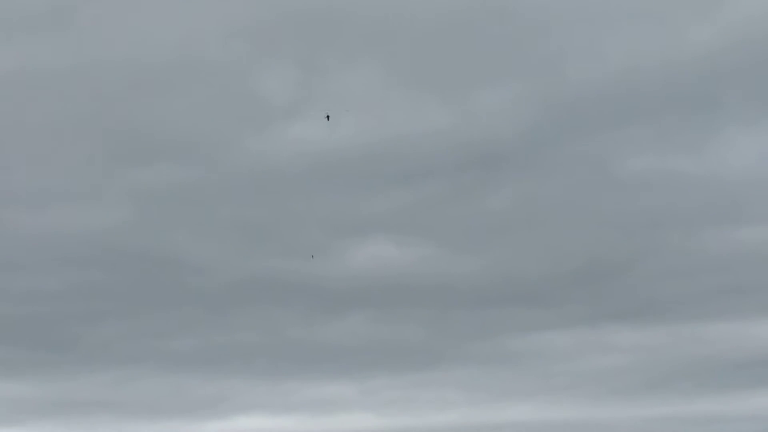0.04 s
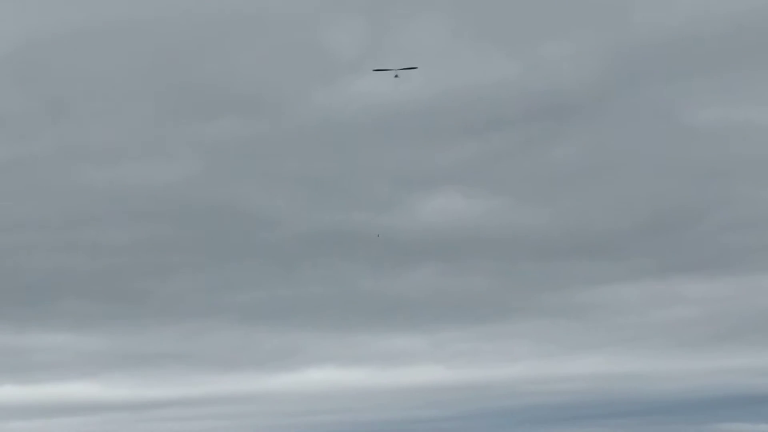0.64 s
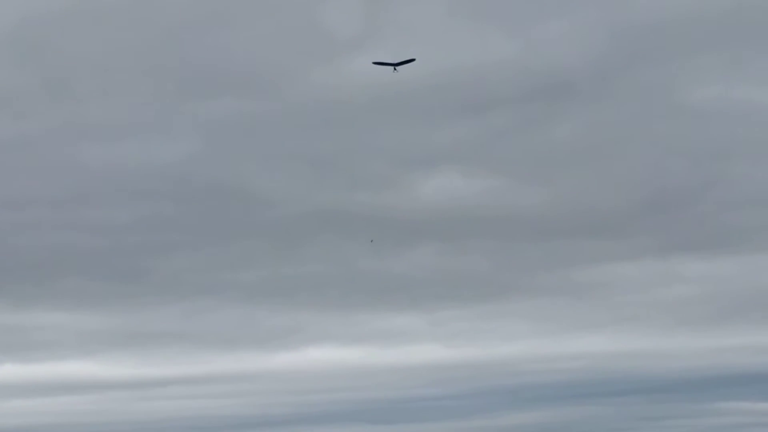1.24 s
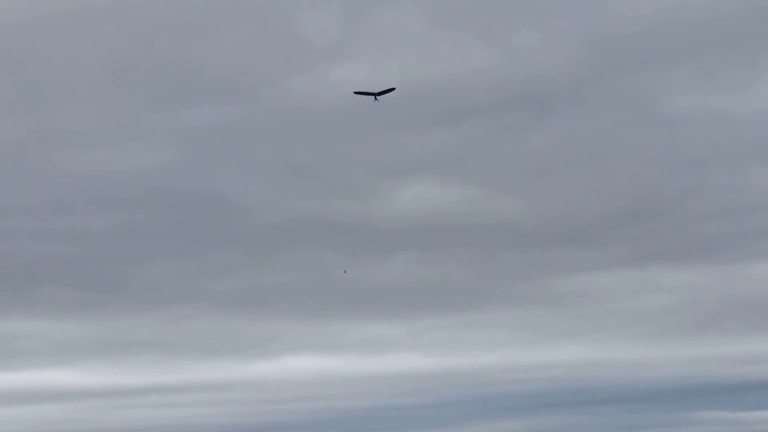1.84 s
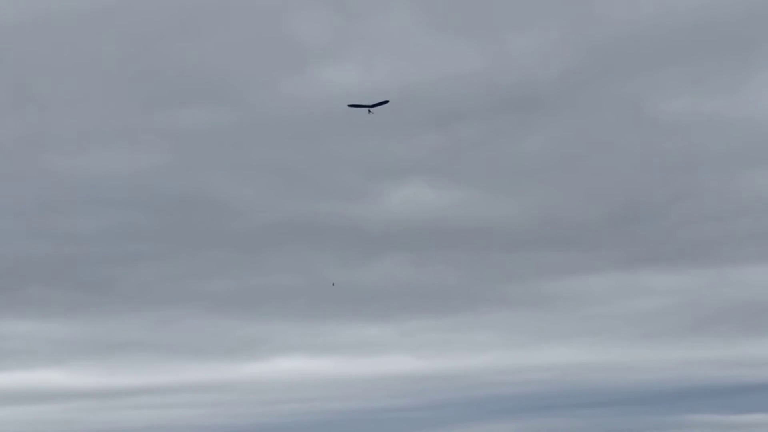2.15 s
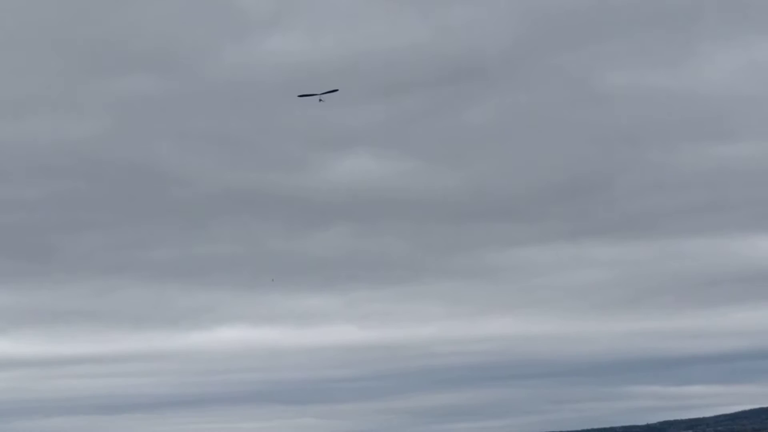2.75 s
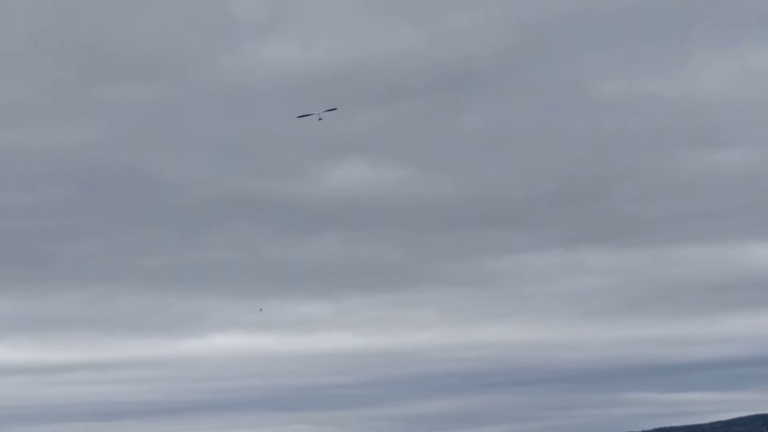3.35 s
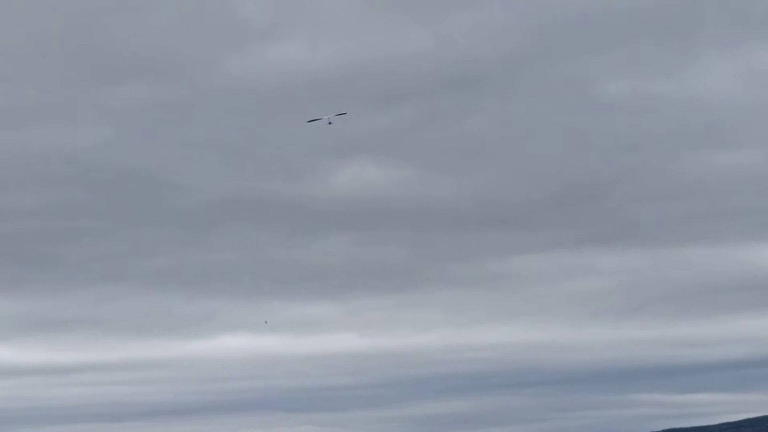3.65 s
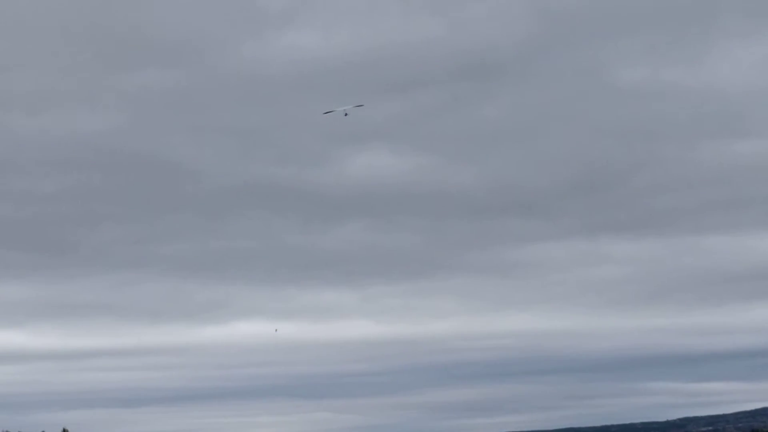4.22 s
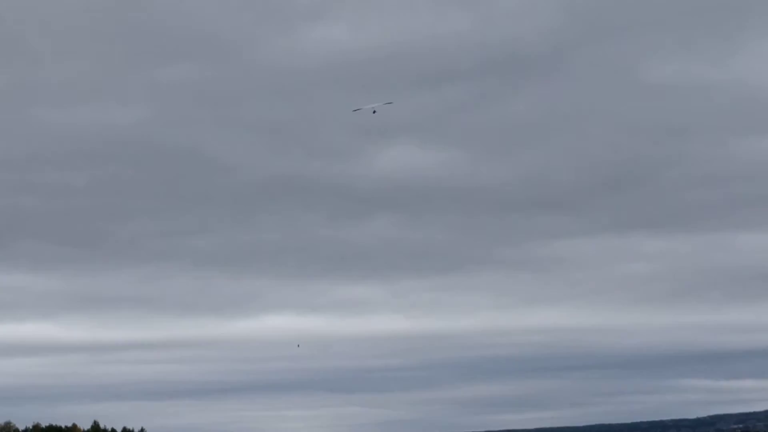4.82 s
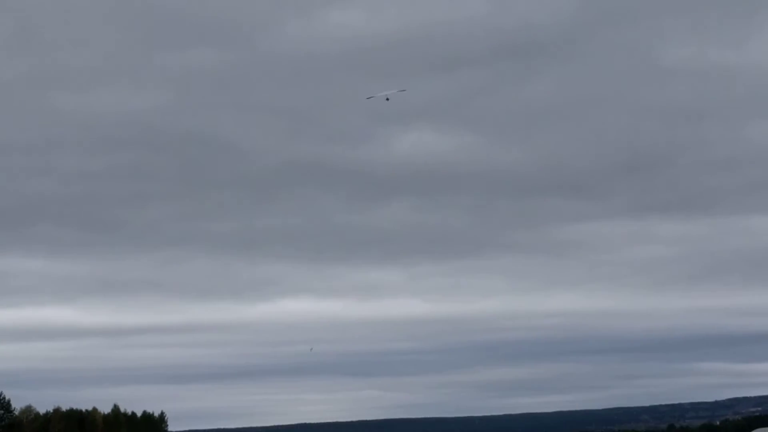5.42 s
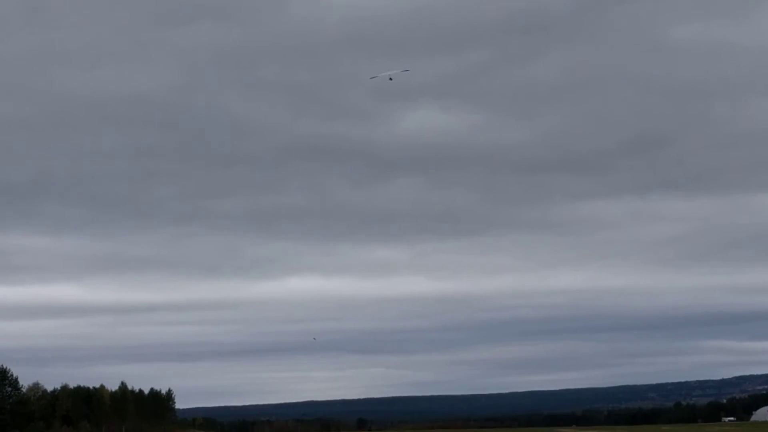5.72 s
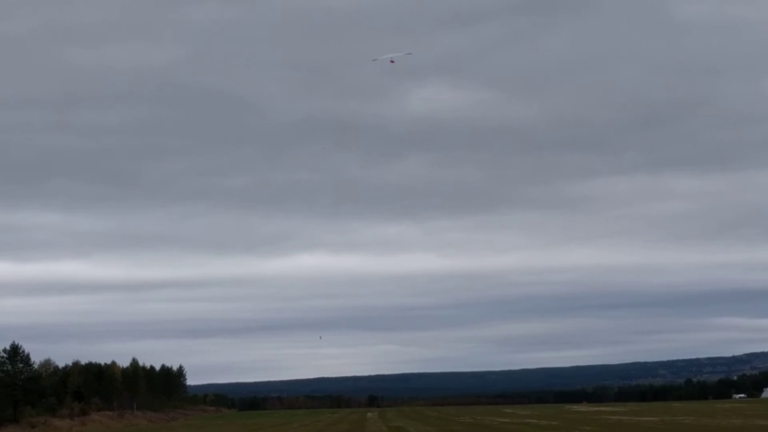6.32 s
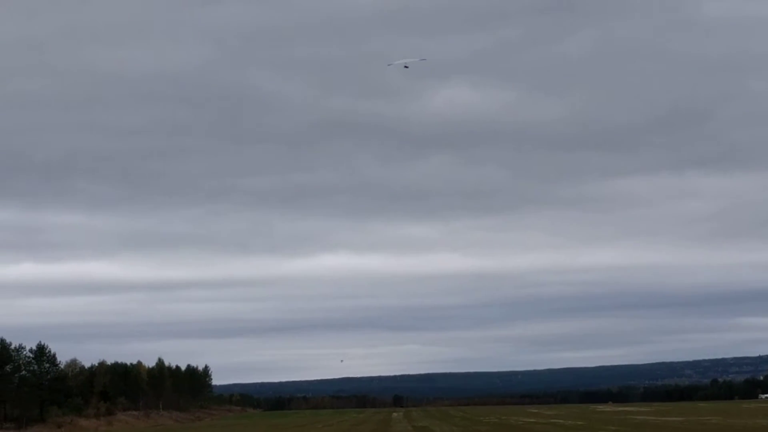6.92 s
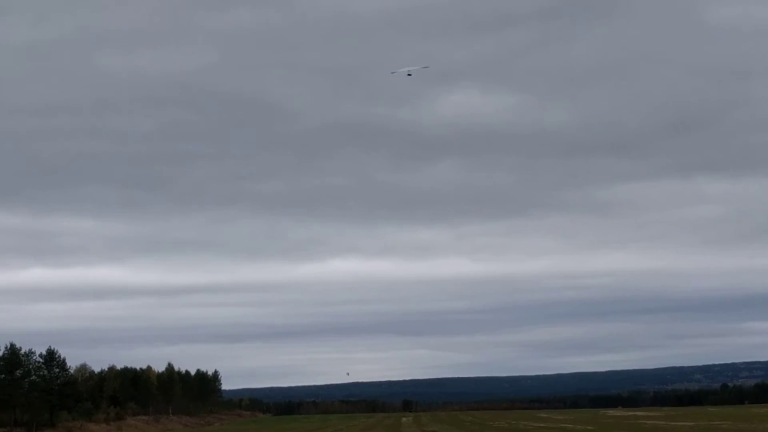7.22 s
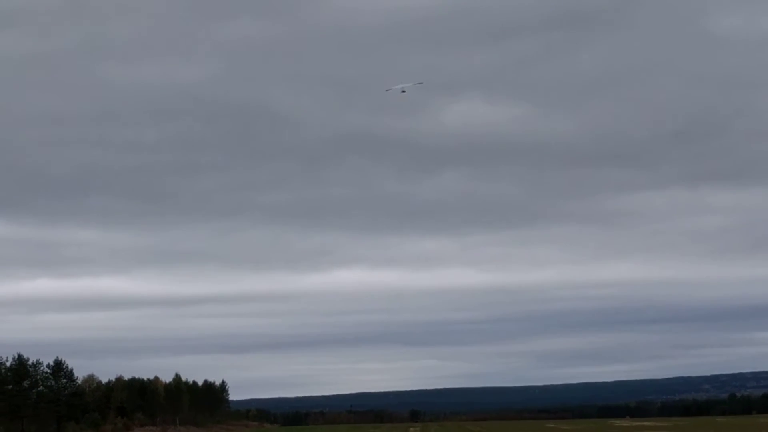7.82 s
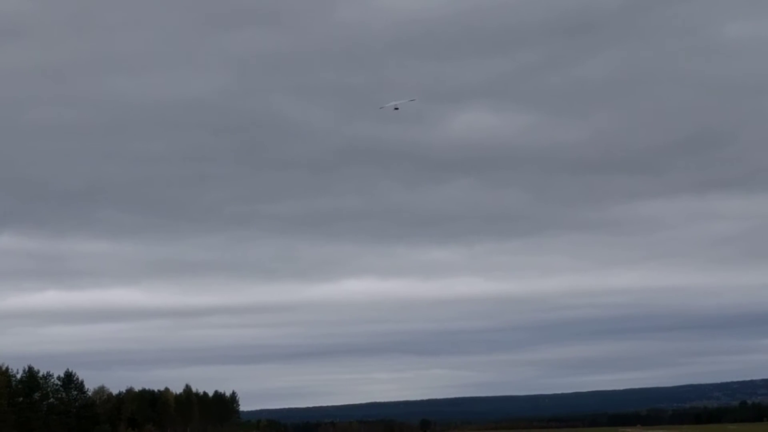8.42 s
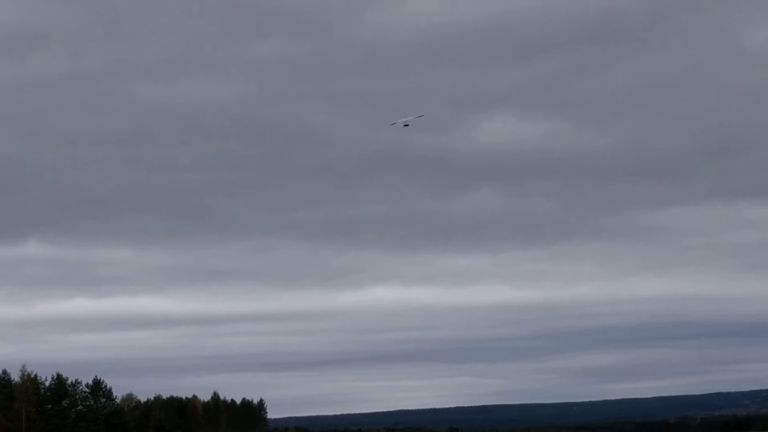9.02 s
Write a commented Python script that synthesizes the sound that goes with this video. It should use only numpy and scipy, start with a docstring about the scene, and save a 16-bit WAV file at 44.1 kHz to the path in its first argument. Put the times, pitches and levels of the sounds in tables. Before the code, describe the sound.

A tow line hisses loudly off a reel and dies away, leaving faint ticks, one metallic scrape and low wind rumble.

```python
"""Tow line reel on an airfield.

A line rushes off a reel, hissing and whistling in its guide, and dies down within two seconds.
It slaps the guide as it slackens. The reel idles on with a faint tick-tock, rattles and one squeak;
the line scrapes once over ringing metal, and a catch snaps shut near the end.
Gusts rumble on the microphone over murmuring trees and rustling grass."""
import sys
import numpy as np
from scipy import signal
from scipy.fft import rfft, irfft
from scipy.io import wavfile
from scipy.ndimage import uniform_filter1d

SR = 44100
rng = np.random.default_rng(int(sys.argv[2]) if len(sys.argv) > 2 else 0)


def to_wav(s):
    """Save 16-bit WAV."""
    ch = np.atleast_2d(s).T  # columns
    pcm = np.round(np.clip(ch, -1, 1) * 32767)  # PCM
    wavfile.write(sys.argv[1], SR, pcm.astype(np.int16))


N = 399546
TIME_S = np.arange(N) / SR

# running line (time [s], level [dB], relative body [dB], relative top [dB])
RUSH_CURVE = [(0.0, -21.5, -17, -10), (0.014, -23.5, -16, -10.5), (0.342, -26.5, -13.5, -13.5),
              (1.01, -40, -3, -17.5), (1.264, -48.5, 2.5, -13), (1.34, -48, 0, -18)]
# line friction (frequency [Hz], level [dB])
RUSH_SPECTRUM = [(60, -17), (280, -7), (600, -11.5), (1400, -10.5), (1900, -10), (2300, -11.5),
                 (3300, -6.5), (4500, -4.5), (5600, -18), (7000, -14), (8900, -8.5), (10300, -20),
                 (12500, -37), (15500, -51)]
# line whistling in the guide (time [s], pitch [Hz], relative level [dB])
WHISTLE_CURVE = [(0, 4650, 1), (.18, 4600, 3), (.3, 4390, -1), (.5, 4215, -13), (.75, 4160, -19),
                 (1.4, 4420, -9)]
# two flicks per turn (turns left at the last flick, level [dB], pitch [Hz])
TURN_FLICKS = [(2, -39, 4340), (1.35, -48.5, 5700)]
# line hitting the guide (time [s], level [dB], relative body [dB], t60 [s])
SLAP_HITS = [(0.092, -16, -16, .045), (0.1598, -15, -21, .04), (0.23, -17.5, -16, 0.021),
             (0.2845, -12.5, -18, 0.023), (0.3708, -12.5, -24, .046), (0.4583, -14.5, -18.5, 0.061),
             (0.941, -20, -32, .08), (1.3789, -21.5, -14.5, 0.055), (1.5401, -11.5, -20, 0.062),
             (1.5641, -24, -11, 0.15), (2.0127, -24, -10, .072), (2.5974, -33, -14.5, 0.086),
             (2.656, -29, -16, 0.083), (2.811, -38.5, -20, 0.13), (3.6635, -38, -22, 0.046)]
# line strokes over metal (time [s], level [dB], t60 [s])
SCRAPE_STROKES = [(4.224, -30.5, 0.23), (4.268, -27.5, 0.21), (4.316, -31, 0.082), (4.34, -36.5, 1.26),
                  (4.470, -29.5, 0.5), (4.598, -36.5, 0.7), (4.69, -46, 0.28)]
# one tick per idle turn (time [s])
TICK_TIMES_S = [3.6226, 3.801, 3.9959, 4.904, 5.1213, 5.36, 5.6216, 5.842, 6.0561, 6.3177, 6.552, 6.765,
                6.983, 7.2384, 7.444, 7.641, 7.8476, 8.0621, 8.309, 8.487, 8.692, 8.967]
# axle squeak (time [s], pitch [Hz], level [dB])
SQUEAK_CURVE = [(3.198, 1910, -90), (3.203, 1950, -46), (3.211, 2130, -44), (3.218, 2410, -46),
                (3.228, 2820, -58), (3.24, 3000, -100)]
# its partials (harmonic number, level [dB])
SQUEAK_HARMONICS = [(1, -17), (2, -0.5), (3, -9), (4, -13)]
# wind on the microphone (time [s], level [dB])
GUST_CURVE = [(0, -49), (0.2, -47), (0.95, -41.5), (1.1, -49.5), (1.52, -49.5), (1.68, -40.5), (2.0, -45),
              (2.62, -46), (2.9, -55), (3.1, -38), (3.65, -42.5), (4.0, -50), (5.2, -39.0), (5.65, -41),
              (5.85, -55.0), (6.55, -48.5), (7.0, -49.5), (7.58, -49.0), (7.72, -44.0), (8.45, -40),
              (8.65, -44), (8.85, -37.5), (9.06, -42)]
# breeze (time [s], trees [dB], grass [dB])
BREEZE_CURVE = [(2.1, -64.5, -69), (2.72, -63, -62), (2.82, -63.5, -65.5), (4.15, -61, -63),
                (4.95, -59.5, -61), (5.22, -59.5, -65.5), (5.51, -59, -61), (6.04, -64.5, -70),
                (6.83, -61, -66.5), (7.14, -65, -67), (8.75, -63, -68.5)]

# contacts (time [s], level [dB])
METAL_KNOCKS = [(4.2695, -6.5)]
CATCH_CLICKS = [(8.811, -37), (8.8125, -8.5), (8.821, -23.5)]
LOUD_RATTLES = [(1.8941, -51.5), (2.2124, -54.5), (2.386, -55), (3.0724, -52.5), (3.246, -53.5),
                (3.442, -55.5), (4.0267, -52.5), (5.695, -55.5), (5.968, -58.5), (6.2447, -58),
                (6.9112, -58.5), (7.0319, -58.5), (8.36, -54), (8.5265, -58.5), (8.881, -48.5)]
THUMP_HITS = [(2.015, -44), (2.656, -45.5), (3.662, -41.5), (4.274, -46.5), (4.408, -39.5), (6.547, -48),
              (7.677, -47.5), (7.725, -42.5), (8.445, -47.5), (8.759, -48)]

# resonances (frequency [Hz], width [Hz], gain [dB])
GUIDE_MODES = [(1850, 82, -5.5), (2640, 90, 4), (5020, 880, 0)]
FRAME_MODES = [(1000, 91, 0)]
SNAG_RING = [(1150, 310, -7.5), (2750, 350, -1.5), (3900, 500, -0.5), (4850, 560, 0), (8500, 1800, -11),
             (12400, 250, -13)]
HOUSING_MODES = [(312, 34, -3), (697, 26, 7.5), (915, 145, 4.5), (1240, 340, -0.5), (1870, 120, 6),
                 (2670, 290, 6.5), (3300, 230, 3), (3620, 130, -0.5), (4200, 150, -7)]
METAL_MODES = [(1467, 8.6, -11.5), (1640, 6.5, -3), (1803, 13, -7), (1900, 21, -5.5), (2135, 31, -5),
               (2317, 29, -3.5), (2550, 22, -12), (2720, 22, -2.5), (2930, 11, -4), (2950, 13, 0),
               (3320, 13, 1.5), (3360, 24, -10), (3720, 26, -1.5), (3980, 19, -10), (4000, 41, -5),
               (4250, 13, 2), (4580, 23, -4), (4650, 37, -14)]
CATCH_RING = [(1180, 480, 4.5), (1710, 270, 6.5), (2750, 220, -0.5), (3620, 220, 9), (5540, 1050, -8)]
TICK_RING = [(2420, 80, -4), (4060, 57, 5.5), (4670, 71, 5.5), (5057, 38, 11), (6600, 900, -9.5),
             (8360, 400, -11), (9150, 500, -12)]
TOCK_RING = [(3300, 250, 0)]

# noise spectra (frequency [Hz], level [dB])
SLAP_SPECTRUM = [(100, -16), (300, -13.5), (500, -8.5), (1200, -1.5), (1800, -10.5), (2700, -5),
                 (4200, 8.5), (5500, -2.5), (6500, -7.5), (9000, -5.5), (11000, -21.5), (15500, -31)]
SCRAPE_SPECTRUM = [(250, -14), (600, -18.5), (1400, -16.5), (1900, -12), (3000, -4), (3800, 1), (4900, -2),
                   (5800, -11.5), (8500, -11), (11000, -21), (15000, -40)]
RATTLE_GRASS_SPECTRUM = [(800, -42), (2800, -2.5), (3600, -0.5), (4700, 0.5), (5600, -6), (7000, -10.5),
                         (8800, -7), (10500, -17.5), (15000, -29)]
RUMBLE_SPECTRUM = [(20, -41), (32, -38), (45, -5), (62, 0.5), (85, -6.5), (120, -9.5), (180, -24),
                   (300, -50), (600, -60.5)]
BUFFET_SPECTRUM = [(50, -23.5), (105, 4.5), (160, 2), (250, -5.5), (400, -23.5), (800, -38.5), (2000, -55)]
THUMP_SPECTRUM = [(60, -8), (170, 5), (350, -6.5), (600, -15), (1500, -35), (5000, -57)]
TREE_SPECTRUM = [(100, -2.5), (270, -6), (380, -1), (520, -7), (750, -2), (1000, 1), (1300, -5),
                 (1650, -3.5), (2200, -15), (3500, -27), (8000, -48)]
AIR_SPECTRUM = [(500, -2), (2500, 4), (3200, 0), (4100, 0.5), (5500, -1.5), (7000, -0.5), (9000, 0.5),
                (11000, -4.5), (15500, -4)]


def running_line():
    """Fibres drag through the guide and whistle; the fluttering line presses unevenly, dulls as it slows."""
    level_db, body_db, top_db = in_time(RUSH_CURVE)
    whistle_hz, whistle_db = in_time(WHISTLE_CURVE)
    speed = np.interp(TIME_S, [0, .2, .4, 1.5], [.93, .49, .31, .21])
    flutter = from_db(1.3 * drift(260) + .58 * drift(47.7))
    body, middle, top = friction_bands(RUSH_SPECTRUM, per_s=5000, spread_db=1.5, smooth_db=-1.5)
    guide = 2.04 * speed * resonate(white(), GUIDE_MODES)
    tone = from_db(whistle_db) * whistle(whistle_hz, width_hz=460)
    middle = even(middle + guide + tone, window_s=.19)
    frame_hum = .84 * (1 - speed) * resonate(white(), FRAME_MODES)
    body = even(body + frame_hum, window_s=.21)
    rush = middle + from_db(body_db - .1) * body + from_db(top_db + 4.5) * top
    coasting_db = np.interp(TIME_S, [1.34, 1.5, 1.85, 2.1, 3], [0, -5, -16, -20, -84])
    return flutter * from_db(level_db + coasting_db - 1.16) * rush


def snags():
    """The running line chatters against the guide until it runs out."""
    rush_db = in_time(RUSH_CURVE)[0]
    chatter = by_chance(per_s=38, level_db=-3, spread_db=7)
    hits = [(s, db, .02) for s, db in chatter if s < RUSH_CURVE[-1][0]]
    return resonate(white() * from_db(rush_db) * bursts(hits, hold_s=.0015), SNAG_RING)


def flicks(stop_s=1.61, braking_turns_per_s2=24):
    """Loose line zips off the evenly braking reel twice a turn, ever slower over seven turns."""
    out, turns_earlier = 0, np.arange(7)
    for turns_left, level_db, hz in TURN_FLICKS:
        times_s = stop_s - np.sqrt(2 * (turns_left + turns_earlier) / braking_turns_per_s2)
        hits = [(s, db, .04) for s, db in zip(times_s, level_db - .1 * turns_earlier)]
        out = out + whistle(hz, width_hz=420) * bursts(hits, hold_s=.0042)
    return out


def slaps(taut_until_s=.37, slack_from_s=.9):
    """The line hits the guide with a crunch, brighter while taut; heavy hits ring the hollow housing."""
    times_s, db, body_db, t60_s = np.transpose(SLAP_HITS)
    top_db = np.interp(times_s, [taut_until_s, slack_from_s], [-9.5, -23])
    body, middle, top = friction_bands(SLAP_SPECTRUM, per_s=6900, spread_db=4, smooth_db=-2)
    layers = [(body, db + body_db - 4), (middle, db - 13.5), (top, db + top_db)]
    crunch = sum(band * bursts(zip(times_s, band_db, t60_s), hold_s=.0034) for band, band_db in layers)
    push = white() * bursts(zip(times_s, db + 1.44 * body_db + 4.5, t60_s), hold_s=.0061)
    return crunch + resonate(push, HOUSING_MODES)


def scrape():
    """The line grips in jerks and rubs metal into ringing; the metal knocks once on its mount."""
    contact = np.interp(TIME_S, [4.78, 4.89], [1, 0])
    pressure = contact * uniform_filter1d(bursts(SCRAPE_STROKES, hold_s=.0075), size=260)
    rub = friction(per_s=4000, spread_db=2, smooth_db=2) * from_db(1.3 * drift(140)) * pressure
    undamped = 1 / (1 + pressure / from_db(-34.5))  # a hard bite damps the metal
    knock = clicks(METAL_KNOCKS)
    hiss = colour(from_db(-3.5) * rub + knock, SCRAPE_SPECTRUM)
    ring = resonate(from_db(2.5) * undamped * rub + from_db(-4) * knock, METAL_MODES)
    return hiss + ring


def catch():
    """A catch snaps shut: a faint touch, one hard click and a small rebound."""
    return resonate(clicks(CATCH_CLICKS), CATCH_RING)


def idling_reel(tock_delay_s=.072):
    """A brushing contact rings the reel once a turn; a softer tock follows."""
    tick_hits = [(s, -54 + 1.4 * rng.standard_normal(), .055) for s in TICK_TIMES_S]
    tock_hits = [(s + tock_delay_s, -65, .05) for s in TICK_TIMES_S]
    ticks = resonate(white() * bursts(tick_hits, hold_s=.0035), TICK_RING)
    tocks = resonate(white() * bursts(tock_hits, hold_s=.0025), TOCK_RING)
    return ticks + tocks


def rattles(t60_s=.065):
    """Loose reel parts rattle drily, the faint ones at random."""
    shakes = list(LOUD_RATTLES) + by_chance(per_s=4.2, level_db=-64.5, spread_db=6)
    envelope = bursts([(s, db, t60_s) for s, db in shakes], hold_s=.0063)
    return colour(white() * envelope, RATTLE_GRASS_SPECTRUM)


def squeak():
    """The dry axle sticks and slips unevenly, rising in pitch."""
    hz, level_db = in_time(SQUEAK_CURVE)
    phase = 2 * np.pi * np.cumsum(hz * (1 + .034 * drift(1500))) / SR
    tone = sum(from_db(db) * np.sin(k * phase) for k, db in SQUEAK_HARMONICS)
    gate = (TIME_S > SQUEAK_CURVE[0][0]) & (TIME_S < SQUEAK_CURVE[-1][0])
    return gate * from_db(level_db - 4.5 + 3.5 * drift(700)) * tone


def wind(eddy_db=1.5, eddies_per_s=14):
    """Eddies rumble on the microphone; stronger gusts break into smaller, higher buffets."""
    level_db = in_time(GUST_CURVE)[0] + eddy_db * drift(eddies_per_s)
    rumble = even(colour(white(), RUMBLE_SPECTRUM), window_s=.28)
    buffets = even(colour(white(), BUFFET_SPECTRUM), window_s=.08) * from_db(3.85 * drift(40))
    buffet_db = -11.5 + .69 * (level_db + 40)
    return from_db(level_db - .1) * (rumble + from_db(buffet_db) * buffets)


def thumps(t60_s=.12):
    """Handling and eddies thump dully on the microphone."""
    envelope = bursts([(s, db, t60_s) for s, db in THUMP_HITS], hold_s=.006)
    return colour(white() * envelope, THUMP_SPECTRUM)


def field(air_db=-68.5):
    """Far trees murmur and grass rustles with the breeze, over the steady hiss of open air."""
    trees_db, grass_db = in_time(BREEZE_CURVE)
    trees = from_db(trees_db + 1.5 + 1.14 * drift(9.4)) * colour(white(), TREE_SPECTRUM)
    stir_db = -70 + 1.86 * (grass_db - grass_db.mean()) + 1.6 * drift(35)
    rustle = colour(friction(per_s=2700, spread_db=2.5, smooth_db=-9.5), RATTLE_GRASS_SPECTRUM)
    air = from_db(air_db) * colour(white(), AIR_SPECTRUM)
    return trees + from_db(stir_db) * rustle + air


def friction(per_s, spread_db, smooth_db):
    """Tiny catches of uneven size over a smooth hiss; rms 1."""
    sizes = from_db(spread_db * np.minimum(rng.exponential(1, N), 4)) * rng.choice([-1, 1], N)
    catches = rms_one(sizes * (rng.random(N) < per_s / SR))
    return rms_one(catches + from_db(smooth_db) * white())


def friction_bands(spectrum, per_s, spread_db, smooth_db):
    """Independent body, middle and top bands of friction noise; rms 1 each."""
    bands = []
    for edge_hz, kind in [(1700, "low"), ([1700, 6000], "band"), (6000, "high")]:
        noise = colour(friction(per_s, spread_db, smooth_db), spectrum)
        sos = signal.butter(3, edge_hz, kind, fs=SR, output="sos")
        bands.append(rms_one(signal.sosfilt(sos, noise)))
    return bands


def whistle(hz, width_hz):
    """Breathy tone of wandering strength and phase; rms 1."""
    phase = 2 * np.pi * np.cumsum(hz * np.ones(N)) / SR
    return drift(width_hz) * np.cos(phase) + drift(width_hz) * np.sin(phase)


def bursts(rows, hold_s):
    """Envelope of contacts (time [s], level [dB], t60 [s]) that hold, then decay."""
    power = np.zeros(N)
    for s, db, t60_s in rows:
        start = np.clip(int(s * SR), 0, N)
        age_s = TIME_S[:min(N - start, int((t60_s + hold_s) * SR))]
        decay_db = 60 * np.maximum(age_s - hold_s, 0) / t60_s
        power[start:start + len(age_s)] += from_db(db - decay_db) ** 2
    return np.sqrt(power)


def clicks(rows):
    """One impulse per contact (time [s], level [dB])."""
    out = np.zeros(N)
    for s, db in rows:
        out[int(s * SR)] = from_db(db)
    return out


def by_chance(per_s, level_db, spread_db):
    """Up to 200 random contacts (time [s], level [dB]), one per slot of 1 / per_s seconds."""
    rows = [((slot + when) / per_s, level_db + spread_db * (2 * size - 1))
            for slot, (when, size) in enumerate(rng.random((200, 2)))]
    return [(s, db) for s, db in rows if s < TIME_S[-1]]


def colour(x, spectrum, size=8192):
    """Minimum-phase filter through (frequency [Hz], level [dB]); white noise keeps its power."""
    hz, db = np.transpose(spectrum)
    bins_hz = np.arange(size // 2 + 1) * SR / size
    gain = from_db(np.interp(np.log(bins_hz + 1), np.log(hz), db))
    cepstrum = irfft(np.log(gain))[:size // 2]
    response = irfft(np.exp(2 * rfft(cepstrum, size)))
    return signal.fftconvolve(x, response / np.linalg.norm(response))[:N]


def resonate(x, modes):
    """Parallel resonators of alternating sign; white noise roughly keeps its power."""
    out, power = 0, 0
    for k, (hz, width_hz, db) in enumerate(modes):
        radius = np.exp(-np.pi * width_hz / SR)
        scale = (1 - radius ** 2) / 2
        feedback = [1, -2 * radius * np.cos(2 * np.pi * hz / SR), radius ** 2]
        ring = signal.lfilter([scale, 0, -scale], feedback, x + 1e-18)
        out = out + (-1) ** k * from_db(db) * ring
        power += from_db(db) ** 2 * scale
    return out / np.sqrt(power)


def drift(knots_per_s):
    """Random piecewise-linear curve; spread 1."""
    knots = rng.standard_normal(N // 8)
    return np.interp(TIME_S * knots_per_s, np.arange(len(knots)), knots) * np.sqrt(3 / 2)


def even(x, window_s):
    """Hold the running rms at 1; quick lumps remain."""
    return x / np.sqrt(uniform_filter1d(x * x, int(window_s * SR)) + 1e-12)


def in_time(curve):
    """Each value column at every sample."""
    times_s, *columns = np.transpose(curve)
    return [np.interp(TIME_S, times_s, column) for column in columns]


def white():
    """Fresh white noise."""
    return rng.standard_normal(N)


def rms_one(x):
    """Scale to rms 1."""
    return x / np.sqrt(np.mean(x ** 2) + 1e-20)


def from_db(db):
    """Decibels to gain."""
    return 10 ** (np.asarray(db) / 20)


def scene():
    """Mono mix in the open; no reflections."""
    line = running_line() + snags() + flicks() + slaps()
    reel = catch() + idling_reel() + rattles() + squeak()
    return (line + reel + scrape() + wind() + thumps() + field())[None]


def record(dry, cutoff_hz=15900):
    """Steep low-pass."""
    return signal.sosfilt(signal.ellip(10, .1, 80, cutoff_hz, fs=SR, output="sos"), dry)


dry = scene()
out = record(dry)
to_wav(out)
```